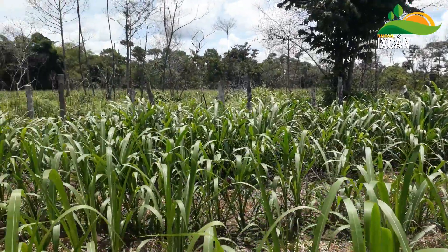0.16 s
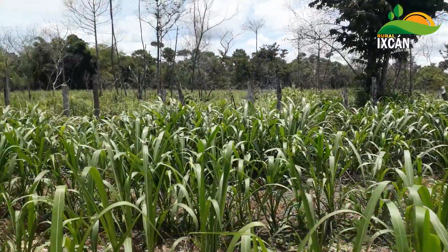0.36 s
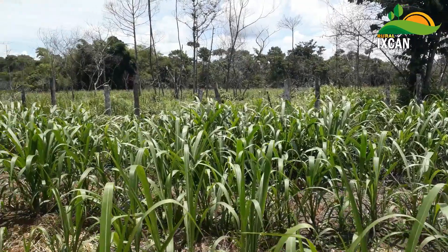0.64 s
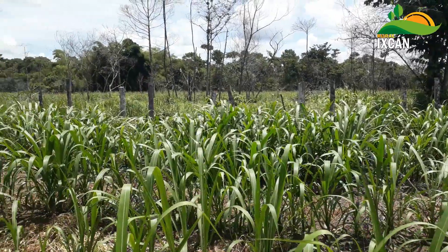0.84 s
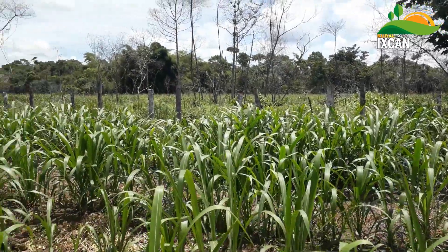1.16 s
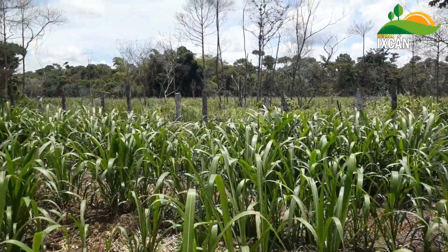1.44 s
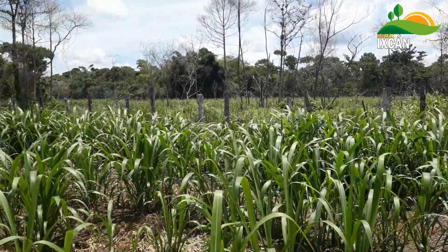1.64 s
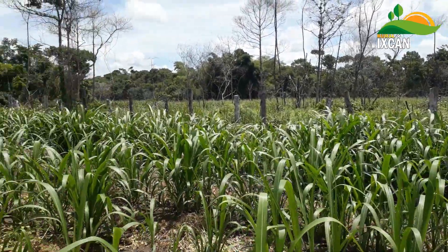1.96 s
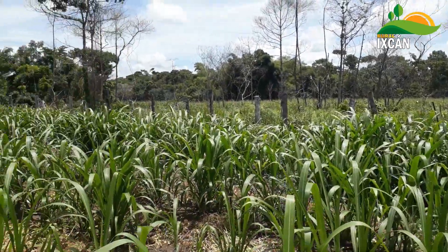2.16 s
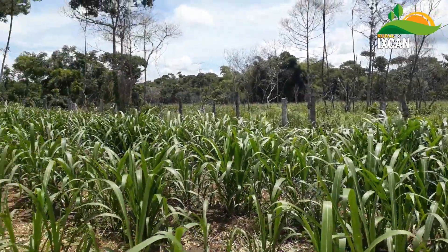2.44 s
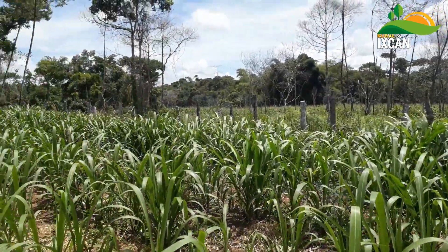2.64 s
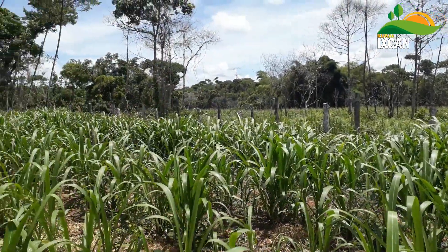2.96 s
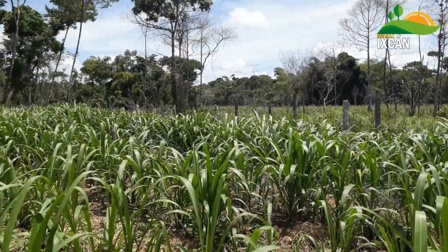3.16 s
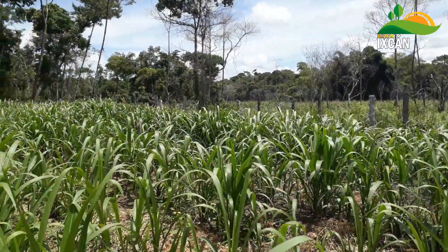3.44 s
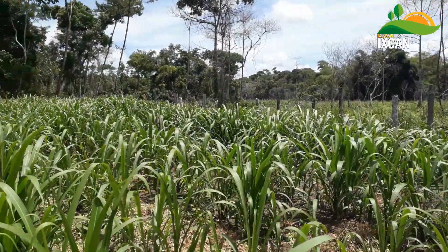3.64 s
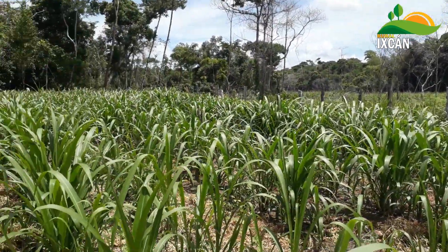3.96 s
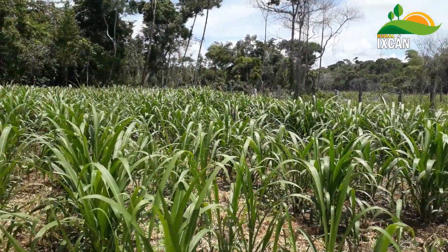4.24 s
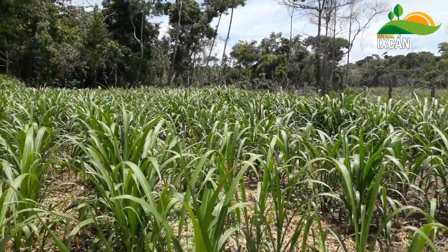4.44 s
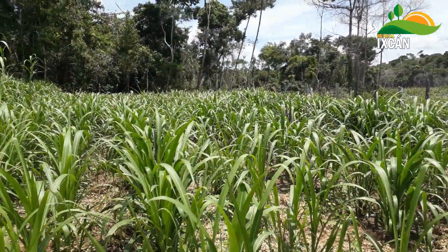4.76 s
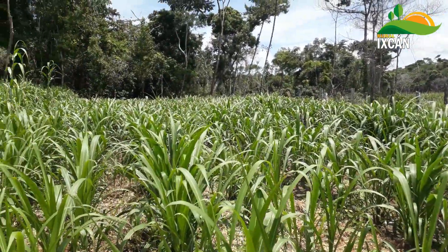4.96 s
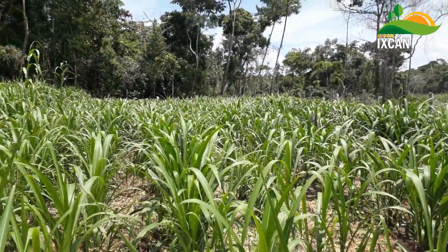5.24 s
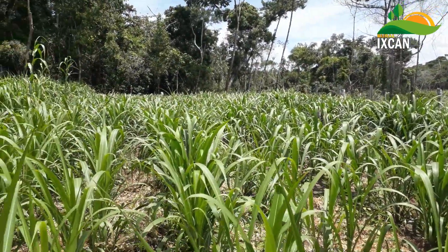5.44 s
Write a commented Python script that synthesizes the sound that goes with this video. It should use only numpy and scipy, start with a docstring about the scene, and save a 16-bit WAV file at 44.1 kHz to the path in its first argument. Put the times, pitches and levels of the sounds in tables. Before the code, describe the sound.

Long grass blades rub, tick and scrape in light wind over soft airy rush, with distant bird whistles and a hard tap ending it.

```python
"""Tall forage grass in an open field, heard from among the leaves, over a faint rush of air.
It opens with a strong rub of blades, ticks, a scrape and stalk knocks; a far bird whistles, then one chips.
From 1.7 s whistles rise and arch while the rub swells and settles; a trill starts near 3.9 s.
More swells and a long scrape come by 4.6 s, then thin high notes, soft bumps, and a hard tap at 5.6 s.
Leaves and air are shaped noise, birds are gliding tones, knocks and the tap are tones that die fast."""
import sys
import numpy as np
from scipy import signal
from scipy.io import wavfile

SR = 44100
rng = np.random.default_rng(int(sys.argv[2]) if len(sys.argv) > 2 else 0)


def log_audio(samples):
    """Write samples as a 16-bit WAV file to the path given in sys.argv[1]."""
    # one column per channel
    frames = np.atleast_2d(samples).T
    # limit to full scale, then quantise
    limited = np.clip(frames, -1, 1)
    pcm = np.round(limited * 32767).astype(np.int16)
    wavfile.write(sys.argv[1], SR, pcm)


N = 247425
TIME = np.arange(N) / SR   # seconds
CUTOFF_HZ = 15800


def from_db(db):
    """Decibels to gain."""
    return 10 ** (np.asarray(db) / 20)


def rms_one(x):
    """Scale to unit power."""
    return x / np.sqrt(np.mean(x ** 2) + 1e-20)


def at_hz(points, hz):
    """Read a table between its rows, with pitch spaced in octaves."""
    table_hz, value = np.array(points).T
    return np.interp(np.log(hz), np.log(table_hz), value)


def band(x, low, high):
    """Keep the sound between two pitches, with gentle edges."""
    sos = signal.butter(2, [low, min(high, .48 * SR)], "band", fs=SR, output="sos")
    return signal.sosfilt(sos, x + 1e-18)


def drift(rate_hz):
    """A smooth random wander around zero with a spread of one."""
    r = np.exp(-80 * np.pi * rate_hz / SR)
    # made at one value per 40 samples; the first 2000 let the filter settle
    kicks = rng.standard_normal(N // 40 + 2002)
    slow = signal.lfilter([1], [1, -2 * r, r * r], kicks)[2000:]
    return np.interp(np.arange(N) / 40, np.arange(len(slow)), rms_one(slow))


def third_octaves(low_hz):
    """(low, centre, high) in Hz of bands that start below the cutoff."""
    edges = low_hz * 2 ** (np.arange(31) / 3)
    return [(a, np.sqrt(a * b), b) for a, b in zip(edges, edges[1:]) if a < CUTOFF_HZ]


# colour of the air: pitch_hz, level_db (per Hz, before the overall level)
AIR = [(30, -4.5), (60, -3), (110, 3.5), (170, 3.5), (260, 1.5), (350, 3), (700, -1.5), (1500, -2.5),
       (3200, -7), (5000, -11.5), (7000, -17.5), (9700, -32), (15000, -18)]
# how alike left and right are: pitch_hz, likeness (1 = the same)
AIR_LIKENESS = [(30, 1), (125, 0.93), (300, 0.88), (700, 0.9), (2000, 1)]
# how the low rumble comes and goes: time_s, change_db
RUMBLE = [(0, 4), (0.55, 5), (0.9, -1), (3.4, -1), (4.3, 0.5), (5.6, 2.5)]
AIR_DB, RUMBLE_TOP_HZ = -66.5, 190


def air(patchy_db=2.5):
    """The far, smooth rush of the field: noise, a little wide in the bass, where a rumble comes and goes."""
    white, out = rng.standard_normal((2, 2, N)), 0
    rumble_db = np.interp(TIME, *np.transpose(RUMBLE))
    for k, (low, hz, high) in enumerate(third_octaves(low_hz=26.7)):
        mid, side = band(white[k % 2], low, high)   # neighbouring bands use separate noise
        alike = np.clip(at_hz(AIR_LIKENESS, hz), 0, 1)
        bass_share = 1 / (1 + (hz / RUMBLE_TOP_HZ) ** 2)
        gain = from_db(at_hz(AIR, hz) + bass_share * rumble_db + patchy_db * drift(15.5))
        out = out + gain * (np.sqrt(1 + alike) * mid + np.sqrt(1 - alike) * side * [[1], [-1]])
    return from_db(AIR_DB) * rms_one(out)


def forest_edge(x, wet_db):
    """Trunks and foliage scatter a faint tail behind each note."""
    t = TIME[:SR // 2]
    t60 = .2   # seconds to die away by 60 dB
    scatter = rng.standard_normal(len(t)) * np.exp(-np.log(1000) * t / t60)
    tail = signal.oaconvolve(x, scatter / np.linalg.norm(scatter))[:N]
    return x + from_db(wet_db) * tail


def bird(notes, shape, waver, flicker_db):
    """One gliding tone per note, wavering in pitch and strength on its way through the air."""
    out, wobble, flicker = np.zeros(N), 1 + waver * drift(99), flicker_db * drift(35)
    share, ratio, shape_db = np.transpose(shape)
    for start_s, length_s, level_db, pitch_hz in notes:
        on = (TIME >= start_s) & (TIME < start_s + length_s)
        u = (TIME[on] - start_s) / length_s   # 0 to 1 through the note
        phase = 2 * np.pi * np.cumsum(pitch_hz * np.interp(u, share, ratio) * wobble[on]) / SR
        edges = np.clip(10 * np.minimum(u, 1 - u), 0, 1)   # fade the first and last tenth
        gain = from_db(level_db + np.interp(u, share, shape_db) + flicker[on])
        out[on] += edges * gain * np.sin(phase)
    return out


CHIP_START_S, CHIP_EVERY_S, CHIP_S, CHIP_HZ = .208, .1222, .031, 3700
CHIP_DB, CHIP_SPREAD_DB = -55.2, .8


def chips(count=8):
    """Notes of one bird that repeats a short falling chip at an even pace, some stronger than others."""
    return [(CHIP_START_S + k * CHIP_EVERY_S, CHIP_S,
             CHIP_DB + CHIP_SPREAD_DB * rng.standard_normal(), CHIP_HZ) for k in range(count)]


TRILL_START_S, TRILL_EVERY_S, PIP_S, PIP_HZ = 3.946, .0418, .019, 4600
# level of the last pip, growth per pip, unevenness in time
PIP_DB, TRILL_GROWS_DB, TRILL_JITTER_S = -58, .15, .003


def trill(count=9):
    """Notes of another bird: a quick, slightly uneven trill of tiny pips that grows toward its end."""
    return [(TRILL_START_S + k * TRILL_EVERY_S + TRILL_JITTER_S * rng.standard_normal(), PIP_S,
             PIP_DB - TRILL_GROWS_DB * (count - 1 - k), PIP_HZ) for k in range(count)]


# note shapes: share_of_note (0 to 1), pitch_ratio, change_db
CHIP_SHAPE = [(0, 1.18, -2), (.3, 1.05, 0), (.55, .94, 0), (.8, .85, -2), (1, .78, -8)]
PIP_SHAPE = [(0, .975, -4), (.45, 1, 0), (1, 1.02, -5)]
CHIP_WAVER = .016   # pitch unsteadiness, as a share of the pitch


def chipping():
    """The chip and the trill: fast short gliding tones."""
    repeats = [(chips(), CHIP_SHAPE), (trill(), PIP_SHAPE)]
    return sum(bird(notes, shape, CHIP_WAVER, flicker_db=1.5) for notes, shape in repeats)


# whistled notes, all with: start_s, length_s, level_db, pitch_hz (level and pitch before the note shape)
# lower whistles that sweep upward
RISES = [(1.905, .125, -60.5, 3670), (2.235, .105, -58.5, 3670), (3.628, 0.056, -65, 1950)]
# high whistles that rise a little and level off
SLURS = [(1.7, 0.12, -58.5, 4370), (2.045, .12, -58, 4290), (2.36, 0.135, -61, 4270)]
# arched whistles
ARCHES = [(0.05, .135, -53, 3680), (2.548, .135, -54, 3820), (2.826, .127, -52, 3750),
          (3.118, .121, -52, 3750), (3.405, .135, -54, 3730)]
# gently falling notes
FALLS = [(2.435, 0.07, -62, 5050), (4.945, 0.075, -54.5, 7750), (5.235, .085, -64, 4400)]
# thin high notes
THIN_NOTES = [(4.775, .08, -55, 9080), (4.857, .095, -45.5, 8600)]
# note shapes, all with: share_of_note (0 to 1), pitch_ratio, change_db
RISE_SHAPE = [(0, .765, -6), (.3, .785, -3), (.68, .92, 0), (1, 1, -7)]
SLUR_SHAPE = [(0, .89, -3), (.3, .94, -3.5), (.55, 0.99, 5), (.8, 1, -2.5), (1, 0.96, -6)]
ARCH_SHAPE = [(0, .785, -8), (.2, .815, -1), (.48, .925, 0), (.62, .975, 0), (.76, 1, -1), (.86, .985, 0),
              (.93, .92, 1), (1, .84, -3)]
FALL_SHAPE = [(0, 1.025, -3), (.35, 1, 0), (1, .972, -6)]
THIN_SHAPE = [(0, .962, -5), (.2, .983, 1), (.45, 1, -2), (.7, .99, 0), (1, .965, -7)]
WHISTLE_WAVER = .007   # pitch unsteadiness, as a share of the pitch


def whistles():
    """Far whistles: pure tones that glide up, over or down."""
    songs = [(RISES, RISE_SHAPE), (SLURS, SLUR_SHAPE), (ARCHES, ARCH_SHAPE),
             (FALLS, FALL_SHAPE), (THIN_NOTES, THIN_SHAPE)]
    return sum(bird(notes, shape, WHISTLE_WAVER, flicker_db=2.6) for notes, shape in songs)


# soft bumps on the microphone: middle_s, level_db, pitch_hz, length_s
BUMPS = [(4.875, -57, 74, 0.02), (5.505, -68, 79.6, 0.062)]


def bumps():
    """Soft bumps on the microphone: a low tone that swells and fades."""
    out = 0
    for middle_s, level_db, pitch_hz, length_s in BUMPS:
        age = TIME - middle_s
        swell = np.exp(-(2 * age / length_s) ** 2)
        out = out + from_db(level_db) * swell * np.sin(2 * np.pi * pitch_hz * age)
    return out


# hard tap by the microphone: start_s, level_db (before the mode levels)
TAPS = [(5.6066, -20.5)]
# tones that ring in the tap: pitch_hz, level_db, t60_s (time to die away by 60 dB)
TAP_MODES = [(495, -18, 0.0076), (940, -6.5, 0.015), (1650, 7, 0.0023), (3530, -1.5, 0.0029),
             (6400, -6.5, 0.0016)]
TAP_LOWEST_HZ = 365   # a tap has no bass


def taps():
    """A hard tap right by the microphone: a few tones struck together that die within a few cycles."""
    out = 0
    for start_s, level_db in TAPS:
        age = np.maximum(TIME - start_s, 0)
        for hz, mode_db, t60 in TAP_MODES:
            gain = from_db(level_db + mode_db - 60 * np.minimum(age / t60, 10))
            out = out + gain * np.sin(2 * np.pi * hz * age)
    return band(out, TAP_LOWEST_HZ, CUTOFF_HZ)


# stalk knocks: start_s, level_db, blow_hz (the blow is strongest here, on the STALK pitches),
# stem_db (how much the whole stem rings), pitch_ratio (of this stalk)
KNOCKS = [(0.069, -42.5, 810, -4, 0.82), (0.0897, -41, 820, -9, 1.02), (0.2384, -40, 1290, -20, 0.944),
          (2.3188, -37.5, 1850, 3, 0.94), (2.5344, -37.5, 1120, -14, 1.04),
          (2.6154, -43.5, 1080, -13, 0.99), (3.956, -45, 1150, -17, 1.45)]
# tones of a stalk: pitch_hz (before pitch_ratio), level_db, t60_s (time to die away by 60 dB)
STALK = [(336, -0.5, 0.024), (510, 0.5, 0.034), (780, 2, 0.011), (1146, 2.5, 0.016), (1400, -3, 0.017),
         (1780, 1, 0.016), (2040, 3, 0.017), (2590, 5.5, 0.0091), (3820, 2, 0.016)]


def knocks(focus_db=4.5, scuff_db=-2.0, scuff_s=0.0057, stem_hz=600, lowest_hz=260):
    """Stalks bump: dying tones, strongest near the pitch of the blow, with a brief scuff of noise."""
    out, t = np.zeros(N + SR), TIME[:SR // 16]
    hz, mode_db, t60 = np.transpose(STALK)[:, :, None]
    signs = (-1) ** np.arange(len(hz))[:, None]
    decay = np.exp(-np.log(1000) * t / t60)
    for start_s, level_db, blow_hz, stem_db, ratio in KNOCKS:
        octaves_away = np.abs(np.log2(hz / blow_hz))
        strength = signs * from_db(mode_db - focus_db * octaves_away + stem_db * (hz < stem_hz))
        ring = np.sum(strength * np.sin(2 * np.pi * hz * ratio * t) * decay, axis=0)
        scuff = band(rng.standard_normal(len(t)) * np.exp(-t / scuff_s), 1200, 16000)
        at = round(start_s * SR)
        out[at:at + len(t)] += from_db(level_db) * (ring + from_db(scuff_db) * scuff)
    return band(out[:N], lowest_hz, CUTOFF_HZ)   # thin stalks radiate no bass


# resonances common to leaf sounds: pitch_hz, width_hz, gain_db
LEAF_PEAKS = [(2380, 760, 6), (6670, 880, 7), (7900, 340, -1.5), (8560, 230, 4.5), (9600, 710, -8)]


def leaf_colour(x):
    """Leaf resonances: a chain of broad peaks and dips."""
    for hz, width, gain_db in LEAF_PEAKS:
        peak = signal.lfilter(*signal.iirpeak(hz, hz / width, fs=SR), x)
        x = x + (from_db(gain_db) - 1) * peak
    return x


# short scrapes of one blade edge along another: start_s, level_db (before the rise and fall), dying_s
SCRAPES = [(0.069, -25.5, 0.0068), (4.572, -45.5, 0.036), (5.502, -41, 0.013)]


def scrapes(top_db=9.5, catch_db=4.5):
    """A toothed edge drags briefly: a bright noise rasp that catches and dies away."""
    envelope = 0
    for start_s, level_db, dying_s in SCRAPES:
        age = np.maximum(TIME - start_s, 0)
        envelope = envelope + from_db(level_db) * (1 - np.exp(-age / 0.0013)) * np.exp(-age / dying_s)
    teeth = rng.standard_normal(N) * from_db(catch_db * drift(200))
    rasp = band(teeth, 800, 7000) + from_db(top_db) * band(teeth, 10200, 12600)
    return envelope * rms_one(leaf_colour(rasp))


def snap(t, crack_s, tail_s, tail_db):
    """Envelope of a snap: a short crack, then the blade shivers out."""
    return np.exp(-t / crack_s) + from_db(tail_db) * np.exp(-t / tail_s)


# level is at the strongest stirring, before the gain of ticks()
FAINT_TICKS_PER_S, FAINT_TICK_DB, FAINT_TICK_SPREAD_DB = 26, -61.5, 7


def faint_ticks():
    """Small ticks at random, softer where the stirring is softer: rows like those of the loud ones."""
    chance = rng.random((round(FAINT_TICKS_PER_S * N / SR), 4))
    start_s = chance[:, 0] * N / SR
    stir_db = np.interp(start_s, *np.transpose(STIR)) - max(db for _, db in STIR)
    level_db = FAINT_TICK_DB + stir_db + FAINT_TICK_SPREAD_DB * (2 * chance[:, 1] - 1)
    brightness = 8 * chance[:, 2]
    zing_db = 10 * chance[:, 3] - 5
    return list(zip(start_s, level_db, brightness, zing_db))


# loud leaf ticks: start_s, level_db (before gain_db and colour), brightness (dB per octave),
# zing_db (high ring of the blade)
TICKS = [(0.07, -44, 6, 3), (0.1198, -44, 0, 2), (0.1464, -43, 3, 2.5), (0.177, -56, 2, -6),
         (0.193, -58, 4, 4), (0.2105, -55, 0, 3), (0.5322, -47, 0, 0.5), (0.5494, -54, -0.5, -6),
         (0.592, -52, -0.5, -1), (0.609, -58.5, 3, 2), (0.6527, -60, 6.5, 0), (0.75, -54.5, 5.5, 2),
         (0.8272, -53, 0, -2), (0.8363, -36.5, 2.5, -1), (0.8612, -53.5, 4, -3), (0.8922, -61, -3, 4),
         (0.941, -58.5, 4, 6), (0.967, -53.5, 5.5, -2), (1.1123, -64, 7, 8.5), (1.2058, -59, 5, 2),
         (1.2165, -52.5, 0.5, 5), (1.2207, -58.5, 9, 5), (1.23, -64, 11, -3), (1.2657, -53.5, 6, -2),
         (1.3437, -61, 7, 5.5), (1.512, -53.5, 2.5, 1.5), (1.588, -62, 9, 6), (1.665, -60, 0, 3),
         (1.6984, -59.5, 5, 10), (1.8393, -44.5, 1.5, -1.5), (1.9143, -57.5, 3, 2), (1.9412, -60.5, 4, 9.5),
         (2.031, -66, 12, -15), (2.1735, -54, 1.5, -10), (2.237, -59, 1, -5), (2.4796, -52, 3, -1),
         (2.6156, -53, 7, 2), (2.7135, -48, 6, -2.5), (2.8092, -48, 2.5, 0), (2.828, -50.5, 0, -10),
         (2.8787, -50.5, -1, -1), (2.927, -44.5, -1, -1.5), (2.9814, -58.5, -3, -7), (3.1026, -61, -5.5, 3),
         (3.1502, -51.5, 4.5, 0), (3.3674, -48.5, 3.5, -3), (3.669, -62, -3.5, -8), (3.719, -50, -2, 1.5),
         (3.9277, -52.5, 2, 6), (4.0024, -57, -4.5, 4.5), (4.124, -51.5, -1, -0.5), (4.224, -56.5, 2, -8),
         (4.276, -57, 6, 2.5), (4.309, -49, 0.5, -1), (5.069, -51, 0, -6), (5.1085, -51.5, -0.5, -3),
         (5.136, -57, -2.5, -8), (5.1869, -54.5, 4, 2), (5.2743, -58, 3.5, 0.5)]
# where a blade cracks: low_hz, high_hz, crack_s (dying time of the crack)
TICK_BANDS = [(500, 1700, .00055), (1900, 4100, .0005), (5200, 8600, .00085), (10500, 16000, .0004)]
# colour of a tick: pitch_hz, level_db (per band)
TICK_COLOUR = [(1000, -12), (2800, 0.5), (6800, 0), (13000, 1)]
TICK_PIVOT_HZ = 6360   # brightness tilts the colour about this pitch
ZING_HZ, ZING_OCTAVES = 6700, 0.4   # centre and width of a blade's high ring


def ticks(gain_db=-8.5):
    """A blade flicks free of its neighbour: a sharp noise crack, bright or dull, gone in about ten ms."""
    out, t = np.zeros(N + SR), TIME[:SR // 25]
    envelopes = [snap(t, crack_s, tail_s=.0035, tail_db=-13) for _, _, crack_s in TICK_BANDS]
    for start_s, level_db, brightness, zing_db in TICKS + faint_ticks():
        at = round((start_s + 0.001148) * SR)   # a fixed short delay after each listed start
        burst = rng.choice([-1, 1], len(t))
        for (low, high, _), envelope in zip(TICK_BANDS, envelopes):
            hz = np.sqrt(low * high)
            colour_db = at_hz(TICK_COLOUR, hz) + brightness * np.log2(hz / TICK_PIVOT_HZ)
            colour_db += zing_db * np.exp(-(np.log2(hz / ZING_HZ) / ZING_OCTAVES) ** 2)
            crack = rms_one(band(burst * envelope, low, high))
            out[at:at + len(t)] += from_db(level_db + colour_db) * crack
    return from_db(gain_db) * out[:N]


# light stirring of the whole stand: time_s, level_db (of the friction)
STIR = [(0, -47.5), (0.4, -55.5), (1.2, -56.5), (2.3, -62.5), (3.55, -73), (4.2, -60.5), (5.2, -69),
        (5.45, -62.5)]
# swells, as nearby blades are pushed along each other: start_s (of full strength), hold_s, level_db,
# rise_s, fall_s, body_db (lift of the lower pitches)
SWELLS = [(0.0, 0.042, -37.5, .1, 0.18, 2.5), (0.552, 0.018, -56.5, 0.058, 0.17, 5),
          (1.411, 0.047, -53, 0.016, 0.06, 4), (1.713, 0.061, -56, 0.12, 0.68, -1),
          (2.16, 0.009, -54.5, 0.075, 0.029, 2), (2.542, 0.19, -49.5, 0.29, 0.2, 0.5),
          (2.874, 0.19, -53, 0.39, 0.092, 2.5), (3.203, 0.13, -46.5, 0.72, 0.048, 0.5),
          (3.41, 0.057, -51, 0.067, 0.066, -1.5), (3.819, 0.017, -37, 0.15, 0.13, 2),
          (4.012, 0.089, -49, 0.24, 0.084, -1), (4.351, 0.052, -43.5, 0.15, 0.081, 1.5),
          (4.422, 0.049, -40.5, 0.11, 0.23, 3), (4.57, 0.02, -42.5, 0.041, 0.17, 3),
          (4.786, 0.29, -49, 0.52, 0.44, 1)]
SWELL_RANGE_DB = 20   # covered in one rise or fall
SWELL_ROUNDING = 1.123   # above one, a swell is round on top and steep at its foot


def friction():
    """Level and body of the rub in dB: swells climb, hold and fall over the stirring, each with its body."""
    power, body = from_db(2 * np.interp(TIME, *np.transpose(STIR))), 0
    for start_s, hold_s, level_db, rise_s, fall_s, body_db in SWELLS:
        before = np.maximum(start_s - TIME, 0) / rise_s
        after = np.maximum(TIME - start_s - hold_s, 0) / fall_s
        swell = from_db(2 * (level_db - SWELL_RANGE_DB * (before + after) ** SWELL_ROUNDING))
        power = power + swell
        body = body + body_db * swell
    return 10 * np.log10(power), body / power


# colour of the rub: pitch_hz, level_db (per Hz, before body and leaf resonances)
RUB_COLOUR = [(120, -18), (310, -10.5), (480, -12.5), (900, -9), (1500, -7), (2400, -4), (3500, -1.5),
              (5000, -6), (6800, -4.5), (9500, -4), (11500, -3.5), (14500, 1), (16000, -7)]
DULLING = 0.16   # dB of extra body per dB that the rub gets softer


def rustle(slips_per_s=170, spread_db=3.5, slip_db=0.0, hiss_db=-1.5, patchy_db=1.0, crowding=0.68,
           flutter_db=1.04):
    """Blades stick and slip: small snaps over a friction hiss, crowding together as the rub grows."""
    level_db, body_db = friction()
    level_db = level_db + flutter_db * drift(7.6)
    louder_db = level_db - np.median(level_db)
    body_db = body_db - DULLING * louder_db
    rate = slips_per_s * from_db(2 * crowding * louder_db)
    clumps_db = 2 * drift(25)
    born = rng.random(N) < rate * from_db(clumps_db) / SR
    sizes = born * from_db(spread_db * np.minimum(rng.exponential(1, N), 3)) / np.sqrt(rate)
    shiver = snap(TIME[:SR // 40], crack_s=0.00022, tail_s=0.006, tail_db=-6) ** 2
    white, out = rng.standard_normal((2, N)), 0
    for k, (low, hz, high) in enumerate(third_octaves(low_hz=107.6)):
        if k % 3 == 0:
            # each slip has its own strength in each octave
            strengths = sizes * from_db(2.56 * rng.standard_normal(N))
            power = np.abs(signal.oaconvolve(strengths ** 2, shiver)[:N])
            grain = np.sqrt(from_db(2 * hiss_db) + from_db(2 * slip_db) * power / power.mean())
        weight = np.clip(np.log(7000 / hz) / np.log(3), 0, 1)   # body lifts the lower bands only
        gain = from_db(at_hz(RUB_COLOUR, hz) + patchy_db * drift(34) + weight * body_db)
        out = out + gain * band(white[k % 2] * grain, low, high)
    return rms_one(leaf_colour(out)) * from_db(level_db)


def scene():
    """Leaves close by in the middle, birds and air behind them; the chipping birds sit deeper in the trees."""
    whistling, chirping = whistles(), chipping()
    birds = forest_edge(whistling, wet_db=-11) + forest_edge(chirping, wet_db=-6)
    leaves = from_db(0.12) * rustle() + leaf_colour(ticks()) + scrapes() + knocks()
    return leaves + bumps() + taps() + birds + air()


def record(dry):
    """The top is cut steeply."""
    return signal.sosfilt(signal.ellip(12, .1, 80, CUTOFF_HZ, fs=SR, output="sos"), dry)


dry = scene()
out = record(dry)
log_audio(out)
```